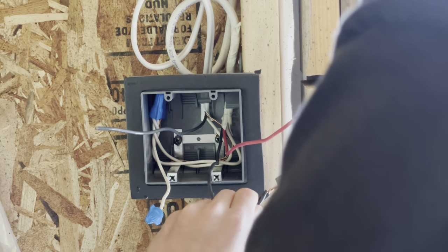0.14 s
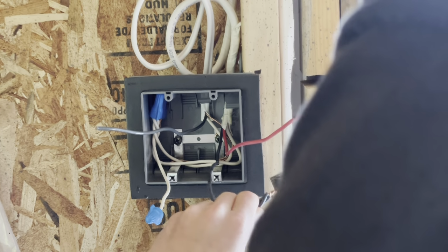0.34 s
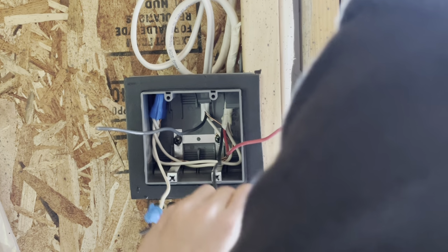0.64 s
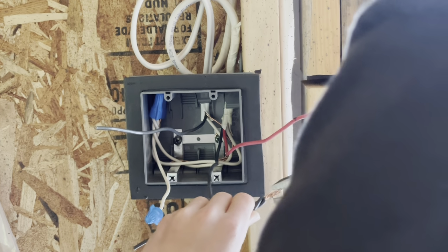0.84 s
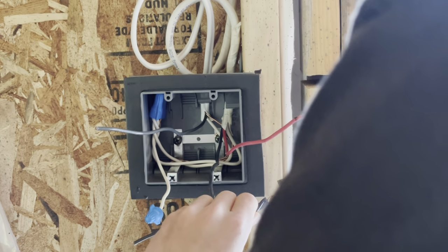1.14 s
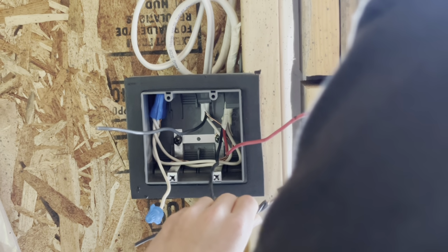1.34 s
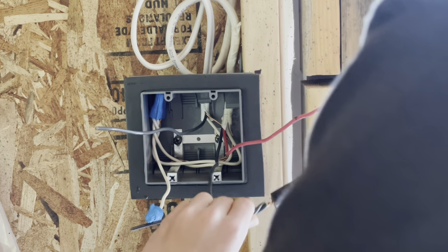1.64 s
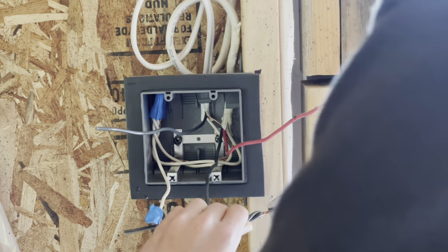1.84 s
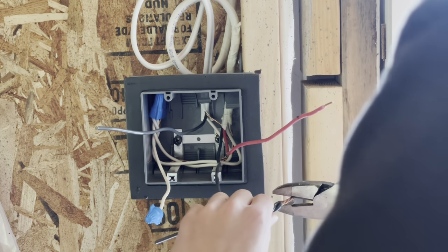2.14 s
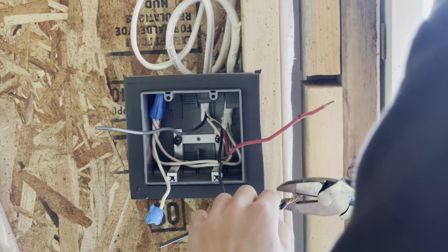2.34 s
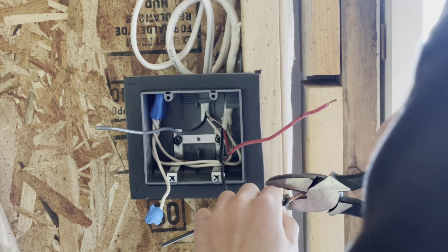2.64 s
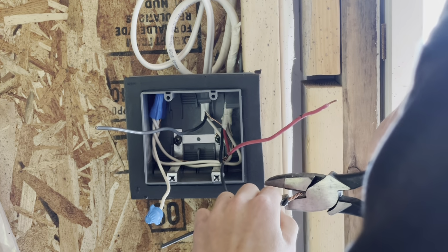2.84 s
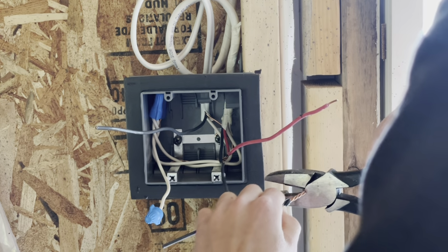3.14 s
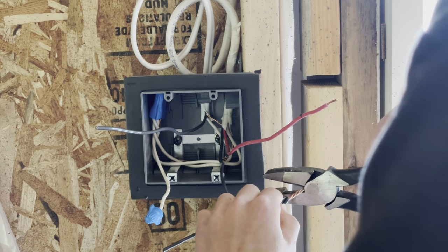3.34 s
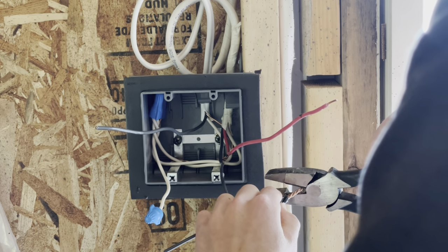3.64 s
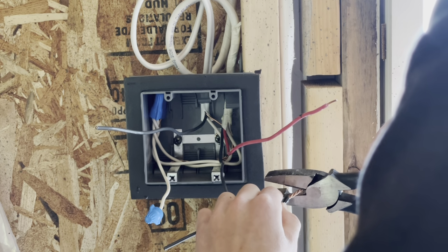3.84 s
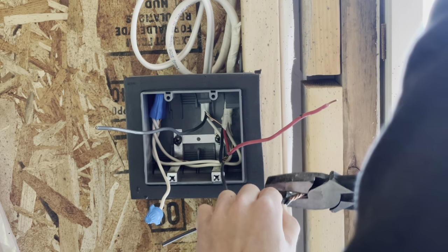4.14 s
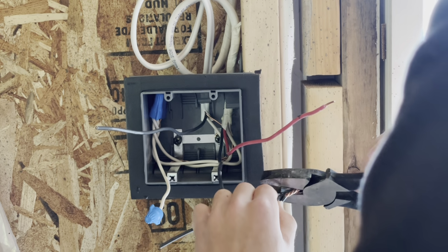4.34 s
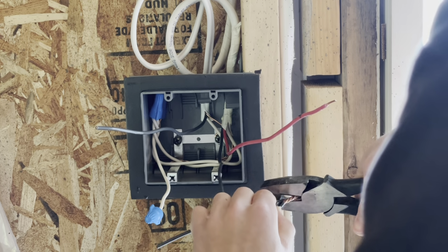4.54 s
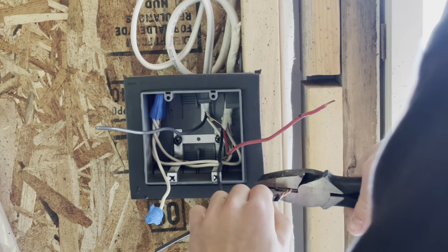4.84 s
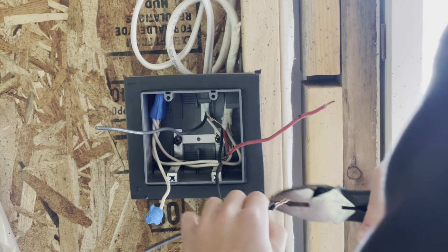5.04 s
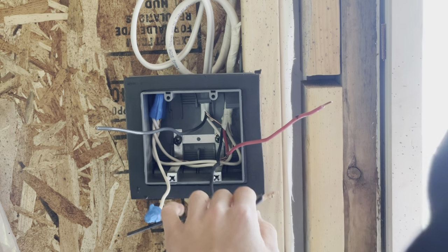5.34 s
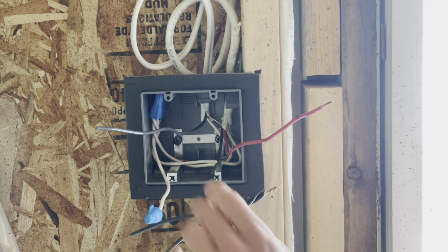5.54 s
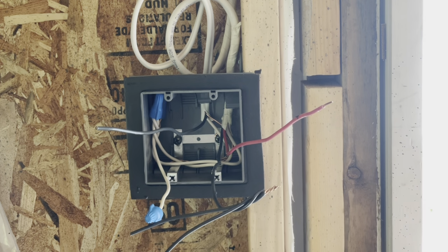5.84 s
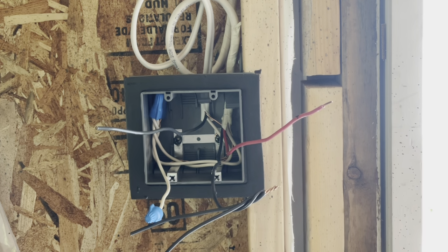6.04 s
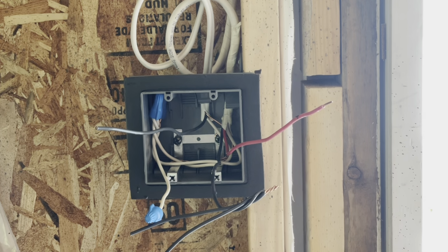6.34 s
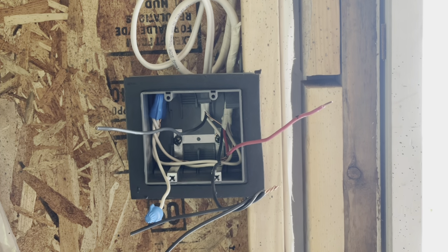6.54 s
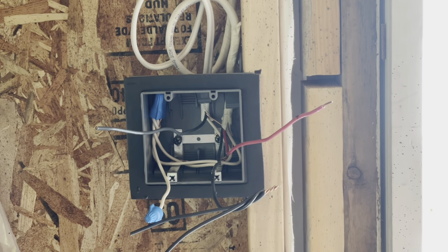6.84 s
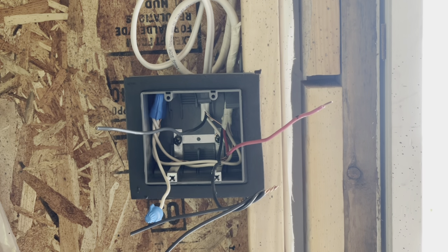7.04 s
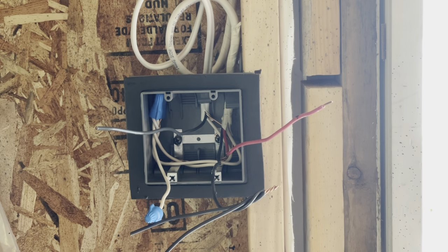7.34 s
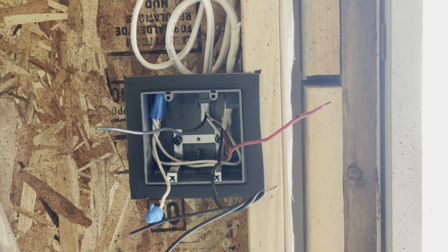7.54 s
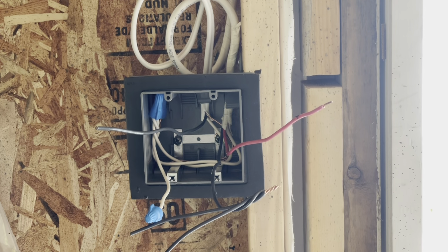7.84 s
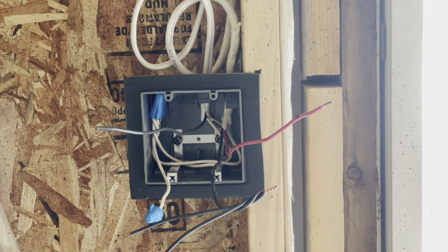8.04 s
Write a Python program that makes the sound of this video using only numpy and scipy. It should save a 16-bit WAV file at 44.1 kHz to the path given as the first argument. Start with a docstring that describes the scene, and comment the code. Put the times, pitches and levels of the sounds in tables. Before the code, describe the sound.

Close by in a bare timber room, pliers and wire ends make faint dull ticks and tiny scrapes against a hollow plastic box. A soft low floor thud comes early. A bird whistles falling notes outside and another buzzes briefly. After a sparse lull and a few more ticks, the pliers land in a loud, bouncing wooden clatter, followed by cloth rustle and small settling bumps.

```python
"""Twisting wire at a switch box

Pliers grip and twist copper wire ends at a plastic switch box in a bare timber room, heard close by.
Wires tick against the box: short noise bursts ring its modes. Scrapes and a sleeve are banded noise.
The floor thuds, then the pliers clatter down on boards: heavier blows ring boards and joists.
A wavering low tone rumbles underneath; outside, one bird whistles in gliding tones and one buzzes in noise."""
import sys
import numpy as np
from scipy import signal
from scipy.fft import rfft, irfft, next_fast_len
from scipy.io import wavfile
from scipy.ndimage import uniform_filter1d

SR = 44100
rng = np.random.default_rng(int(sys.argv[2]) if len(sys.argv) > 2 else 0)


def dump_mix(stems):
    """Bounce the given channels to the path in sys.argv[1] as a 16-bit WAV at rate SR."""
    frames = np.atleast_2d(stems).T  # one column per channel
    limited = np.clip(frames, -1, 1)  # hard clip at full scale
    pcm = np.round(limited * 32767).astype(np.int16)
    wavfile.write(sys.argv[1], SR, pcm)


N = 360738  # length of the scene [samples]
FAST = next_fast_len(N)  # a length that transforms quickly


def undb(db):
    """Turn dB into a gain."""
    return 10 ** (np.asarray(db) / 20)


def unit(x):
    """Scale to rms 1."""
    return x / np.sqrt(np.mean(x ** 2))


def top(x):
    """Scale to peak 1."""
    return x / np.abs(x).max()


def band(x, lo_hz, hi_hz):
    """Keep only the pitches between two limits."""
    sos = signal.butter(2, [lo_hz, min(hi_hz, .45 * SR)], "band", fs=SR, output="sos")
    return signal.sosfilt(sos, x)


def hiss(lo_hz, hi_hz):
    """Band noise of rms 1."""
    return unit(band(rng.standard_normal(N), lo_hz, hi_hz))


def ring(x, modes):
    """Let x drive damped modes (Hz, dB, seconds to fall by 60 dB), each a spinning, shrinking pole."""
    out = 0
    for hz, db, t60 in modes:
        pole = np.exp(2j * np.pi * hz / SR - np.log(1000) / (t60 * SR))
        out = out + undb(db) * signal.lfilter([1], [1, -pole], x).imag
    return out


def turn(x, points, how):
    """Multiply the spectrum of x by how(value), with values read from (Hz, value) points."""
    hz, value = np.transpose(points)
    bins_hz = np.arange(FAST // 2 + 1) * SR / FAST
    values = np.interp(np.log(bins_hz + 1), np.log(hz + 1), value)
    return irfft(rfft(x, FAST) * how(values), FAST)[:N]


def shape(x, points):
    """Colour x by (Hz, dB) points."""
    return turn(x, points, undb)


def curve(table):
    """Read (time, level) points as one level for every sample."""
    s, level = np.transpose(table)
    return np.interp(np.arange(N) / SR, s, level)


def walk(rate):
    """Random levels held for 1 / rate s and smoothed twice; their spread is near 1."""
    k = int(SR / rate)
    steps = np.repeat(rng.standard_normal(N // k + 1), k)
    return 1.269 * uniform_filter1d(uniform_filter1d(steps, k), k)[:N]


def add(out, x, s):
    """Mix x into out from time s."""
    i = int(s * SR)
    out[i:i + len(x)] += x[:N - i]


RUMBLE_HZ, WANDER = 65.5, 0.03996  # centre pitch; how far it strays, as a share of the pitch
LOOSE_DB, STEADY_DB = -61.5, -52.5  # drone levels at which it is loose and steady
SUB_DB = -74.5  # constant deep rumble under the drone
# strength of the low drone over time: (time [s], level [dB])
DRONE_LEVEL = [(0, -55), (.3, -60), (.75, -51.5), (1.1, -62), (1.35, -55), (1.8, -62), (2.35, -59),
               (3.75, -59.5), (4.15, -68.5), (4.65, -58.5), (5.05, -56), (5.85, -53), (6.3, -54.5),
               (6.8, -44.5), (6.95, -52.5), (8.18, -54.5)]


def rumble():
    """A low drone in the structure: its pitch wanders when faint and holds steadier when strong."""
    db = curve(DRONE_LEVEL)
    steady = np.clip((db - LOOSE_DB) / (STEADY_DB - LOOSE_DB), .4, .93)
    drift = (1 - steady) * (walk(6.5) + 2.0 * walk(2.7))
    phase = 2 * np.pi * np.cumsum(RUMBLE_HZ * (1 + WANDER * drift)) / SR
    tone = 2.0 * steady * np.sin(phase) * undb(5.4 * (0.96 - steady) * walk(15))
    noise = (1 - steady) * hiss(61, 82) + 0.21 * hiss(22, 150)
    return undb(db) * (tone + noise) + undb(SUB_DB) * hiss(27, 50)


FLOOR_DB = -73  # level of the air between 110 and 16000 Hz, before its slow wavering
# colour of the still air: (frequency [Hz], relative level [dB per Hz])
AIR_COLOUR = [(12, -42), (20, -25), (48, -5.5), (74, -2), (222, -27), (293, -25), (1860, -43), (7110, -54),
              (8650, -57), (12400, -53.5), (16000, -73)]


def still_air():
    """Quiet background noise, coloured and slowly wavering in level."""
    air = shape(rng.standard_normal(N), AIR_COLOUR)
    return air * undb(FLOOR_DB + 1.4 * walk(4.2)) / np.std(band(air, 110, 16000))


SLEEVE_BODY_DB, SLEEVE_EDGE_DB = -7.5, -3.5  # lower two noise bands, against the sleeve's level
# strength of the rustling sleeve, before its wavering: (time [s], level [dB])
SLEEVE_LEVEL = [(0, -99), (.57, -94), (1.2, -101), (1.85, -87), (2.6, -96), (4.0, -99), (4.16, -92.5),
                (4.68, -99), (5.36, -86.5), (6.08, -83.5), (6.25, -68), (7.3, -69), (7.8, -72),
                (8.18, -84.5)]


def sleeve():
    """Cloth rubs on itself: three bands of noise that swell and waver together."""
    level = undb(curve(SLEEVE_LEVEL) + 1.9 * walk(13))
    body = undb(SLEEVE_BODY_DB) * hiss(550, 1600)
    edge = undb(SLEEVE_EDGE_DB) * hiss(1300, 6200)
    return level * (body + edge + hiss(6300, 14000))


SPOT_DB, SPOT_DETUNE = 4.5, 0.042  # each blow lands on another spot: spread of mode level, pitch share
BOUNCES_PER_S, BOUNCE_S = 460, .0015  # after a blow the parts rattle in small uneven rebounds this long
SETTLE_S, SETTLE_RATIO = 0.0085, 0.698  # a moment later the part settles with a lower ring
AIR_TAIL_DB = -8  # the air of a crack rattles on less than its lower bands
# how fast the crack dies down: decay of its click, edge and air [s]
CRACK_S = [0.0041, 0.0028, 0.0081]
# peak of the crack's click, edge and air, against their set levels [dB]
CRACK_DB = [5, 4.5, 6.5]


def note(push, hz, cycles):
    """Two resonances in a row at one pitch, so the ring swells a little before it fades."""
    once = ring(push, [(hz, 0, 0.89 * cycles / hz)])
    return top(ring(once, [(hz, 0, 1.2 * cycles / hz)]))


def hits(table, body, lows, rise_s, contact_s, chatter_t60, body_db, chatter_db, click_db,
         click_share, crack_tail_db, low_rise_s, low_db, settle_db, loose_db):
    """Each blow rings the part and the body, cracks in three bands, rattles, settles and moves the lows."""
    out, pushes = np.zeros(N), np.zeros(N)
    t = np.arange(SR // 5) / SR
    fade, rise = undb(-60 * t / chatter_t60), 1 - np.exp(-t / rise_s)
    grit = [hiss(660, 2500), hiss(1300, 8100), hiss(7500, 12700)]
    sharp = np.diff(1. * (t == t[1]), append=0)  # a single up-down jolt
    for s, db, hz, edge_db, air_db, cycles in table:
        noise = rng.standard_normal((4, len(t))) * rise
        jolts = (rng.random(len(t)) < BOUNCES_PER_S / SR) * rng.random(len(t))
        rebounds = signal.lfilter([1], [1, -np.exp(-1 / (BOUNCE_S * SR))], jolts)
        rattle = fade * (1.1 + 1.4 * rebounds)
        # the part rings from a sharp contact and a looser one
        tap = noise[0] * np.exp(-t / contact_s)
        own_ring = top(note(sharp, hz, cycles) + undb(loose_db) * note(tap, hz, cycles))
        # the struck body answers with its modes
        spot = rng.standard_normal((len(body), 2))
        modes = [(f * (1 + SPOT_DETUNE * a), g + SPOT_DB * b, t60)
                 for (f, g, t60), (a, b) in zip(body, spot)]
        body_ring = top(ring(tap + undb(chatter_db) * noise[1] * rattle, modes))
        blow = own_ring + undb(body_db) * body_ring
        # the crack: a harder edge clicks more
        start = rng.integers(N - len(t))
        parts_db = [click_db + click_share * edge_db, edge_db, air_db]
        tails_db = [0, 0, AIR_TAIL_DB]
        for grains, part_db, crack_s, crack_db, tail_db in zip(grit, parts_db, CRACK_S, CRACK_DB, tails_db):
            decay = np.exp(-t / crack_s) + undb(crack_tail_db + tail_db) * rattle
            crack = grains[start:start + len(t)] * rise * decay
            blow = blow + undb(part_db + crack_db) * top(crack)
        add(out, undb(db) * blow, s - .001)
        settling = note(noise[3] * np.exp(-t / SETTLE_S), SETTLE_RATIO * hz, cycles)
        add(out, undb(db + settle_db) * settling, s + SETTLE_S)
        # heavy parts move late
        add(pushes, undb(db) * noise[2] * t / low_rise_s * np.exp(-t / low_rise_s), s)
    return out + undb(low_db) * ring(pushes, lows)


TICK_CYCLES = 11.3  # ring length of a tick, roughly
# modes of the plastic box: (frequency [Hz], relative level [dB], time to fall by 60 dB [s])
BOX = [(605, -12.5, 0.029), (801, 12.5, .05), (865, 2.5, 0.055), (1050, 9, 0.12), (1227, 12.5, 0.026),
       (1337, 8.5, 0.053), (1625, -3.5, .04), (2020, 6, .05), (2460, -4, .04), (2730, -8, .04),
       (4300, -9.5, .015)]
# modes of the wall stud behind the box: (frequency [Hz], relative level [dB], time to fall by 60 dB [s])
STUD = [(173, 1, 0.1), (250, 5, 0.033), (311, -2.5, 0.023)]
# wire and jaw ticks: (time [s], level [dB], ring [Hz], edge [dB], air [dB]);
# edge and air are the upper bands of the crack, against the level
TICKS = [(0.047, -63, 820, -31, -35), (0.2, -73.5, 1880, -10, -30), (0.287, -67, 990, 4, -18),
         (0.334, -56.5, 735, -47, -35), (0.556, -61, 905, -25, -32), (0.574, -62, 1500, -9, -36),
         (0.615, -53.5, 785, -11, -16), (0.66, -49, 785, -8.5, -25), (0.698, -41.5, 1030, -29, -37),
         (0.64, -59, 1290, -20, -30), (0.725, -58, 1250, -25, -35), (0.785, -60, 796, -25, -35),
         (0.745, -50.5, 970, -42, -34), (0.829, -52.5, 1340, -3.5, -17), (0.936, -64, 1290, 1, -25),
         (0.985, -62, 1580, -7, -30), (1.03, -55, 1340, -11, -30), (1.058, -60, 1760, -12, -30),
         (1.204, -61, 800, -26, -18), (1.233, -59, 550, 1, -32), (1.421, -63, 670, -8, -28),
         (1.425, -70, 4230, -18, -28), (1.613, -54, 796, -27, -40), (1.615, -56.5, 1340, -12, -40),
         (1.645, -53, 1340, -27, -45), (1.642, -48.5, 770, -44, -48), (1.68, -55, 800, -30, -40),
         (1.717, -54, 777, -38, -35), (1.758, -42.5, 1036, -27, -44), (1.809, -47.5, 922, -42, -49),
         (1.814, -52.5, 1370, -33, -45), (1.861, -57, 715, -34, -30), (1.909, -55, 705, -1, -21),
         (2.03, -55, 1440, -10, -33), (2.067, -54, 850, -13, -25), (2.081, -50.5, 1590, -2.5, -20),
         (2.095, -47.5, 1190, -14, -29), (2.108, -54, 774, -25, -35), (2.253, -64.5, 1320, -18, -30),
         (2.307, -53.5, 1350, -40, -41), (2.33, -49, 1320, -11.5, -40), (2.346, -52, 1270, -10, -30),
         (2.388, -57, 795, -28, -35), (2.486, -54, 895, -34, -25), (2.514, -54.5, 1010, -11, -18),
         (2.522, -49, 840, -31, -18), (2.553, -63, 800, -30, -38), (2.67, -72, 1010, -20, -35),
         (3.047, -55.5, 1330, -1, -18), (3.053, -51.5, 2090, -24, -30), (3.062, -51, 707, -27, -35),
         (3.083, -62, 820, -20, -35), (3.172, -56.5, 1345, -3.5, -14), (3.183, -56, 910, -29, -35),
         (3.265, -69, 860, -23, -35), (3.337, -52, 1386, -10, -19), (4.074, -68.5, 608, -28, -7),
         (4.703, -58.5, 2100, -3.5, -32), (4.864, -51.5, 2400, -12, -15), (4.868, -49, 2700, -12, -27),
         (4.869, -46, 1050, -14, -33), (4.873, -46.5, 743, -20, -40), (4.942, -47.5, 980, -2.5, -9),
         (4.945, -50.5, 2470, -20, -28), (5.34, -51, 1240, -20, -22), (5.345, -57, 2100, -28, -40),
         (5.432, -45.5, 940, -17, -22.5), (5.441, -45, 1180, -48, -40), (5.488, -41, 1200, -38, -30),
         (5.501, -49.5, 970, -35, -40), (5.512, -56, 537, -35, -38), (5.56, -42.5, 1300, -41, -48),
         (5.568, -45, 1040, -48, -46), (5.637, -41.5, 1200, -30, -42), (5.705, -46.5, 2370, 6.5, -25),
         (5.723, -45, 2350, 4, -39), (5.744, -53.5, 1170, -8, -30), (5.84, -50.5, 1174, -23, -22),
         (5.901, -67, 1210, -42, -43), (5.919, -70, 1150, -40, -43), (5.938, -63, 1120, -50, -16),
         (6.054, -63, 1740, 19.5, 19), (6.093, -44, 2700, -2, -35), (6.341, -57, 3600, -4, -20)]


def ticks():
    """Light wire and jaw contacts ring the plastic box, and faintly the stud behind it."""
    return hits([(*row, TICK_CYCLES) for row in TICKS], BOX, STUD,
                rise_s=0.00045, contact_s=0.0085, chatter_t60=0.15, body_db=-5.5, chatter_db=-8.5,
                click_db=-9.5, click_share=0.14, crack_tail_db=-6.0, low_rise_s=0.027, low_db=-44.5,
                settle_db=-11.5, loose_db=-1.5)


THUD_CYCLES, SHAKE_S = 23.8, 0.011  # cycles for a thud's ring to fall by 60 dB; rise time of a shake
# slow low modes under the boards: (frequency [Hz], relative level [dB], time to fall by 60 dB [s])
JOISTS = [(77.3, -3.5, 0.61), (100, -1, 0.32), (170.8, -8.5, 0.78), (240, -2, 0.67), (258.6, -1.5, 0.55),
          (313, 3, 0.55)]
# weight shifting and tools landing on the floor: (time [s], level [dB], pitch [Hz], shake [dB]);
# the shake rattles the joists and stud for a moment
THUDS = [(.05, -47.5, 72.4, -71), (.088, -46.5, 95, -66.5), (0.057, -52, 200, -69),
         (0.062, -46.5, 316, -78), (0.095, -53, 327, -81), (0.673, -24, 65.5, -69), (0.734, -31, 53.3, -81),
         (0.801, -47, 50, -78), (1.341, -60, 295, -70.5), (1.761, -62, 166, -69), (3.059, -53, 150, -83),
         (4.871, -43.5, 215, -64.5), (4.884, -45.5, 130, -75), (4.903, -47.5, 260, -72),
         (4.94, -51.5, 154, -74.5), (6.471, -25.5, 94, -42.5), (6.476, -28, 247, -57),
         (6.655, -30.5, 99, -42.5), (6.663, -33.5, 180, -61.5), (6.817, -21, 89.2, -42),
         (6.859, -20.5, 97, -33.5), (6.954, -40.5, 240, -45.5), (6.961, -36, 100.3, -49),
         (7.555, -38, 170, -55.5), (7.601, -41.5, 63.4, -65), (8.02, -44, 176, -63),
         (8.081, -33, 187, -58.5), (8.149, -41, 62, -71)]


def thuds():
    """A soft push rings the floor at a low pitch and shakes the joists and stud."""
    out, shakes = np.zeros(N), np.zeros(N)
    t = np.arange(SR) / SR
    for s, thud_db, thud_hz, shake_db in THUDS:
        contact = np.sin(np.pi * np.minimum(t * thud_hz, 1))  # a soft contact lasts a cycle
        push = contact * np.sin(2 * np.pi * thud_hz * t)
        add(out, undb(thud_db) * top(ring(push, [(thud_hz, 0, THUD_CYCLES / thud_hz)])), s)
        rattle = rng.standard_normal(len(t)) * t * np.exp(-t / SHAKE_S)
        for hz, db, t60 in [*JOISTS, *STUD]:
            add(shakes, undb(shake_db + db) * top(ring(rattle, [(hz, 0, t60)])), s)
    return out + shakes * undb(1.4 * walk(14))


SCRAPE_LOW_DB = -4  # the low part of every scrape, against its level
SCRAPE_RISE_SHARE = 0.21  # a scrape swells over this share of its length
CRACKLE_PER_S, CRACKLE_DB, CRACKLE_SCATTER_DB = 250, -3, 4.0  # small slips that ring the box
SCRAPE_RING_DB, SCRAPE_RING_CYCLES = -4.5, 19  # the slips also ring the rubbed part at its own pitch
# scrapes of wire, jaws and tools: (start [s], end [s], level [dB], edge [dB], air [dB], ring [Hz]);
# edge and air are the upper noise bands, against the level
SCRAPES = [(0.257, 0.36, -81.5, -4, -2, 920), (0.534, 0.913, -73.5, -22, -13, 770),
           (0.93, 1.088, -68, -3, -26, 1330), (1.188, 1.258, -65, -14, -18, 770),
           (1.429, 1.479, -70.5, -4.5, -26, 674), (1.605, 1.76, -67.5, -41, -44, 770),
           (1.746, 1.945, -71.5, -33, -34, 960), (2.034, 2.14, -74.5, 2, -36, 930),
           (2.252, 2.31, -75.5, -9, -33, 885), (2.296, 2.427, -74.5, -14, -35, 784),
           (2.482, 2.556, -78, -10, -30, 870), (3.995, 4.155, -97.5, 3, 16.5, 696),
           (4.19, 4.387, -93.5, 1, 10, 705), (5.443, 5.714, -73.5, -37, -17, 740),
           (5.71, 5.872, -82.5, 9, 3, 2460), (6.285, 6.43, -60, -6, -4.5, 850),
           (6.777, 6.804, -38, -5, -13, 3300), (6.85, 6.921, -35.5, -20, -32, 527),
           (7.53, 7.638, -56.5, -31.5, -38, 697), (7.994, 8.058, -52, -6, -7.5, 880),
           (8.044, 8.162, -60.5, -3.5, -5.5, 616)]


def scrapes():
    """Wire and metal slip in dense uneven grains: noise bands, plus clicks that ring the box and part."""
    force, own, t = np.zeros((4, N)), np.zeros(N), np.arange(N) / SR
    slips = undb(1.3 * walk(70) + 4.3 * walk(25))
    clicks = (rng.random(N) < CRACKLE_PER_S / SR) * rng.choice([-1, 1], N)
    clicks = clicks * undb(CRACKLE_SCATTER_DB * rng.exponential(size=N))
    for s0, s1, db, edge_db, air_db, hz in SCRAPES:
        i = slice(int(s0 * SR), int((s1 + 0.027) * SR))
        swell = (t[i] - s0) / (SCRAPE_RISE_SHARE * (s1 - s0))
        release = (s1 + 0.032 - t[i]) / 0.091
        env = np.clip(np.minimum(swell, release), 0, 1)
        levels = undb(db + np.array([0, edge_db, air_db, SCRAPE_LOW_DB]))
        force[:, i] += env * unit(slips[i]) * levels[:, None]
        part_ring = ring(clicks[i] + 1e-9, [(hz, 0, SCRAPE_RING_CYCLES / hz)])  # 1e-9 avoids pure silence
        own[i] += env * undb(db + SCRAPE_RING_DB) * unit(part_ring)
    bands = np.array([hiss(550, 1600), hiss(1300, 6200), hiss(6300, 14000), hiss(130, 330)])
    held_box = [(hz, db, t60 / 3) for hz, db, t60 in BOX]  # here its modes die three times faster
    crackle = undb(CRACKLE_DB) * unit(ring(clicks, held_box))
    return np.sum(force * bands, axis=0) + force[0] * crackle + own


WARBLE_DB, WARBLE_PER_S = 1.5, 59.6  # the notes waver in level
# the whistling bird's falling phrase:
# (time into the phrase [s], length [s], start [Hz], end [Hz], level [dB], spread [Hz])
PHRASE = [(-.03, 0.2, 3540, 2720, -82, 503), (0, 0.066, 3660, 3650, -75, 90),
          (0.022, 0.18, 3080, 2970, -70.5, 102), (0.187, 0.12, 2453, 2492, -67.5, 67)]
# when the phrase begins [s]
PHRASE_STARTS = [1.015, 1.635]
# other whistled notes, some in a first call or joining the phrases; last, a falling scrape squeak:
# (time [s], length [s], start [Hz], end [Hz], level [dB], spread [Hz])
NOTES = [(0.345, 0.12, 3770, 3790, -80, 24), (0.368, 0.083, 3450, 3430, -80, 200),
         (0.388, 0.18, 2700, 2510, -76, 200), (0.428, 0.051, 2900, 2920, -72.5, 60),
         (0.476, 0.081, 2920, 2914, -69, 25), (0.498, 0.13, 2280, 2280, -76, 38),
         (0.58, 0.1, 2540, 2520, -70, 48.8), (0.972, 0.06, 2520, 2500, -77, 100),
         (1.057, 0.14, 2420, 2460, -72, 90), (1.622, 0.1, 3550, 3600, -77, 90),
         (1.696, 0.094, 2450, 2440, -70.5, 120), (1.002, 0.12, 4340, 3700, -78, 350),
         (2.007, 0.071, 2450, 2410, -85, 69), (2.023, 0.06, 4300, 3890, -72, 500),
         (2.067, 0.099, 3150, 2890, -74, 300), (2.103, 0.07, 3480, 2890, -87, 280),
         (2.313, 0.035, 4400, 4150, -80, 400), (3.368, 0.07, 6800, 7300, -85, 580),
         (3.552, 0.21, 7550, 7050, -85.5, 610), (4.144, 0.043, 1750, 2090, -87, 140),
         (4.296, 0.093, 2080, 1805, -87, 140), (6.408, 0.025, 5400, 5350, -68, 80),
         (8.085, 0.045, 4620, 3600, -60.5, 500), (8.129, 0.045, 2950, 2850, -66, 200)]


def whistles_and_squeak():
    """Gliding tones, blurred in pitch by noise and left to fade like echoes: bird notes, then a squeak."""
    out = np.zeros(N)
    t = np.arange(SR // 2) / SR  # a note and its fading
    phrases = [(start + s, *rest) for start in PHRASE_STARTS for s, *rest in PHRASE]
    for s, length, hz0, hz1, db, spread_hz in [*NOTES, *phrases]:
        env = np.minimum(t / 0.0031, 1) * np.exp(-np.maximum(t - length, 0) / 0.065)
        env = env * undb(WARBLE_DB * walk(WARBLE_PER_S)[:len(t)])
        low_pass = signal.butter(2, spread_hz, fs=SR, output="sos")
        smear = signal.sosfilt(low_pass, rng.standard_normal((2, len(t))))
        phase = 2 * np.pi * np.cumsum(np.interp(t, [0, length], [hz0, hz1])) / SR
        tone = (0.91 * np.std(smear) + smear[0]) * np.sin(phase) + smear[1] * np.cos(phase)
        add(out, undb(db) * env * unit(tone), s)
    return out


TRILL_DB, TRILL_FADES_S, TRILL_FADE_DB_S2 = -71, 0.87, 114  # steady, then dying away ever faster
# colour of the buzzing bird: (frequency [Hz], width [Hz], relative level [dB])
TRILL_COLOUR = [(4570, 72, -1.5), (5220, 970, 0), (6330, 350, -5.5)]


def trill():
    """A buzzing bird: noise in a few bands that throbs about 26 times a second."""
    noise, t = rng.standard_normal(N), np.arange(N) / SR
    buzz = unit(sum(undb(db) * band(noise, hz - w / 2, hz + w / 2) for hz, w, db in TRILL_COLOUR))
    throb = 1 + 0.21 * np.sin(2 * np.pi * 26.0 * t + 0.96 * walk(3.2))
    level_db = TRILL_DB - TRILL_FADE_DB_S2 * np.maximum(t - TRILL_FADES_S, 0) ** 2
    return undb(level_db) * buzz * throb


# modes of the boards: (frequency [Hz], relative level [dB], time to fall by 60 dB [s])
BOARDS = [(366, -14.5, 0.036), (524, -3, 0.067), (626, -0.5, 0.037), (703.6, -9.5, 0.15), (855, -6, 0.14),
          (930, -6, 0.09), (1077, -7.5, 0.081), (1240, -12.5, 0.11), (1386, -9, 0.032),
          (1700, -17.5, 0.049), (1980, -16.5, 0.04), (2540, -14, .03), (2950, -12.5, .03)]
# tool knocks on the boards, with the long low rings of the floor at 313 Hz:
# (time [s], level [dB], ring [Hz], edge [dB], air [dB], rough ring length [cycles])
KNOCKS = [(6.457, -13, 930, -12.5, -16, 12), (6.459, -25.5, 2980, -29, -31, 27),
          (6.459, -27.5, 2080, -29.5, -28, 7.7), (6.486, -26, 973, -12.5, -32, 8),
          (6.499, -30.5, 1100, -10.5, -25, 4.6), (6.639, -16, 1660, -16, -14, 6),
          (6.643, -21.5, 870, -18.5, -24, 3.6), (6.651, -14.5, 380, -20.5, -26.5, 1.9),
          (6.668, -26.5, 700, -9.5, -20.5, 3.4), (6.685, -28.5, 1490, -15, -25, 6.8),
          (6.714, -32, 1200, -9.5, -14, 3), (6.802, -7, 610, -17, -23.5, 11.2),
          (6.833, -23, 790, -7.5, -10.5, 7.3), (6.854, -14.5, 2400, -3.5, -1.5, 3),
          (6.858, -22, 313, -40, -38, 34), (6.872, -13.5, 613, -17, -28, 7.7),
          (6.893, -16, 566, -35.5, -33.5, 7), (6.946, -6, 960, -11, -9.5, 5.4),
          (6.948, -21.5, 313, -40, -40, 40), (6.951, -11.5, 648, -35.5, -31, 10.6),
          (6.958, -8.5, 547, -41.5, -42, 8.2), (7.003, -15, 874, -25.5, -21.5, 7.3),
          (7.006, -20, 556, -38, -33.5, 7), (7.035, -30, 700, -33, -34, 4.4),
          (7.512, -51, 900, -24, -26, 4), (7.544, -38, 752, -19, -36, 3.1),
          (7.593, -39.5, 800, -20.5, -40.5, 4), (7.69, -55.5, 1100, -13, -30.5, 4),
          (7.909, -55, 811, -9.5, -26, 5.6), (7.999, -43, 1197, -7, -23.5, 3.6),
          (8.073, -46.5, 876, -14.5, -25, 6.3)]


def knocks_and_floor_rings():
    """The pliers clatter down: hard blows ring the boards, the floor and, later, the joists."""
    return hits(KNOCKS, BOARDS, JOISTS,
                rise_s=0.00026, contact_s=0.0037, chatter_t60=0.087, body_db=-6, chatter_db=-8.0,
                click_db=-1, click_share=0.77, crack_tail_db=-7.0, low_rise_s=0.016, low_db=-58.5,
                settle_db=-24, loose_db=-8.5)


# how long the timber room rings: (frequency [Hz], time to fall by 60 dB [s])
ROOM_T60 = [(125, 0.25), (250, 0.76), (500, 0.31), (1000, 0.32), (2000, 0.33), (4000, 0.27), (8000, 0.24),
            (13000, 0.29)]


def room(x, gap_s, cut_s):
    """Diffuse tail of the timber room: noise whose octaves each fade at their own pace, up to cut_s."""
    t = np.arange(SR // 2) / SR
    tail = 0
    for hz, t60 in ROOM_T60:
        tail = tail + band(rng.standard_normal(len(t)), hz / 1.487, hz * 1.315) * undb(-60 * t / t60)
    tail *= np.minimum(t / gap_s, 1) * np.clip((cut_s - t) / 0.025, 0, 1)
    return signal.fftconvolve(x, tail / np.sqrt(np.sum(tail ** 2)))[:N]


# unlike share of the two microphone ports: (frequency [Hz], level [dB])
WIDTH = [(60, -6), (150, -12.5), (300, -10.5), (700, -0.5), (1300, -5.5), (2000, -22), (8000, -17.5),
         (16000, -11.5)]


def scene():
    """Near sounds with their room; the two ports differ mostly in low-mid reflections."""
    drone = rumble() + thuds()
    quiet = sleeve() + ticks() + scrapes()
    clatter = knocks_and_floor_rings()
    # the tails of quiet sounds end abruptly, those of loud knocks run on
    quiet_tail = undb(-11.0) * room(quiet, gap_s=0.0021, cut_s=0.066)
    clatter_tail = undb(-11.5) * room(clatter, gap_s=0.0063, cut_s=0.55)
    near = quiet + clatter + quiet_tail + clatter_tail + drone
    mid = near + whistles_and_squeak() + trill() + still_air()
    reflected = room(quiet, gap_s=0.0014, cut_s=0.033)
    reflected = reflected + undb(-7.0) * room(clatter + drone, gap_s=0.00082, cut_s=.5)
    side = shape(reflected + still_air(), WIDTH)
    side = side + undb(-5.5) * band(clatter, 520, 1200)  # the boards lie to the left
    return np.array([mid + side, mid - side])


CEILING, TOP_HZ = 1.6, 15900  # soft limit, in full scale; upper edge of the sound [Hz]
# how far the left port leads the right: (frequency [Hz], phase [radians])
PORT_PHASE = [(0, 0), (430, -0.0), (690, 0.5), (1550, -0.0), (3010, 0.6), (5170, 0.5), (5770, -1.4),
              (6980, -0.7), (7490, -2.1), (8440, -2.9), (9990, -3.9), (13100, -6.1), (15100, -6.4),
              (16000, -6.5)]


def record(dry):
    """The two ports differ in phase by frequency; the loudest peaks are rounded and the top is cut steeply."""
    right = turn(dry[1], PORT_PHASE, lambda lead: np.exp(-1j * lead))
    ports = np.array([dry[0], right])
    rounded = CEILING * np.tanh(ports / CEILING)
    return signal.sosfilt(signal.ellip(8, .2, 70, TOP_HZ, fs=SR, output="sos"), rounded)


dry = scene()
out = record(dry)
dump_mix(out)
```